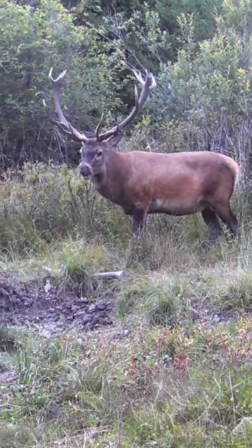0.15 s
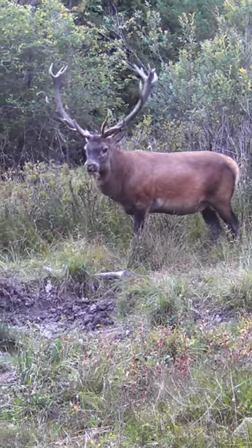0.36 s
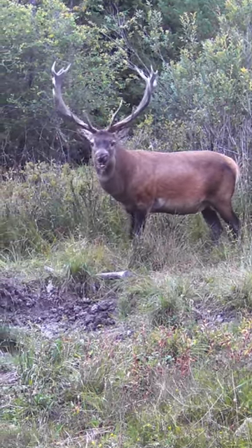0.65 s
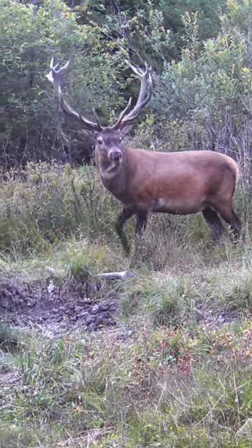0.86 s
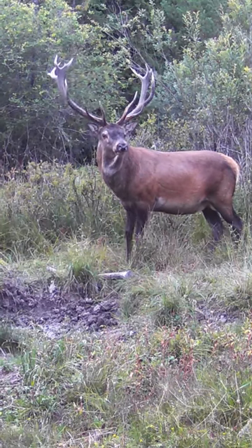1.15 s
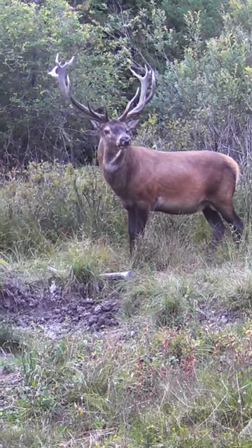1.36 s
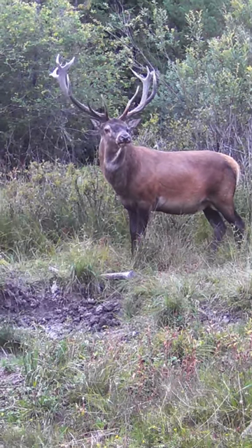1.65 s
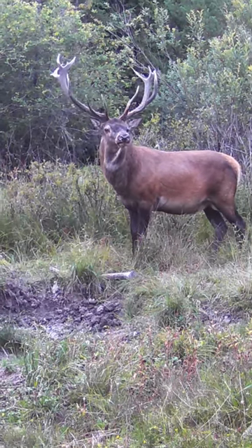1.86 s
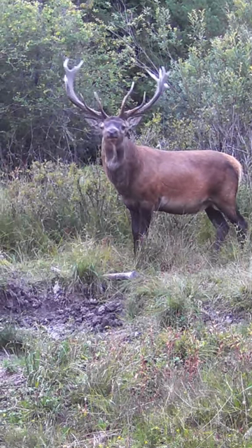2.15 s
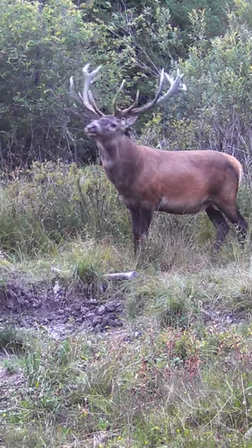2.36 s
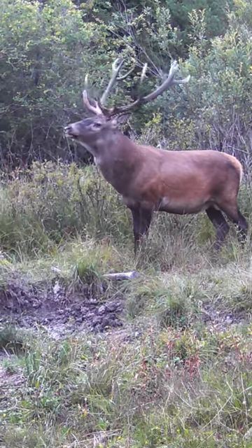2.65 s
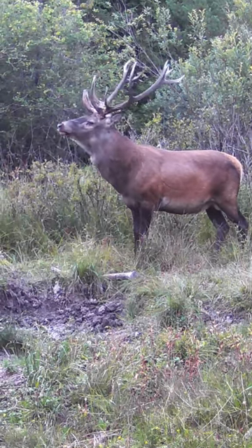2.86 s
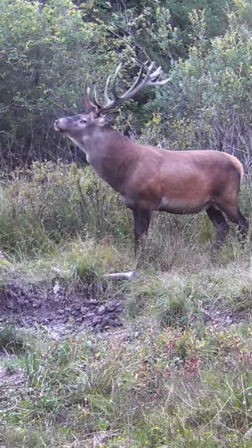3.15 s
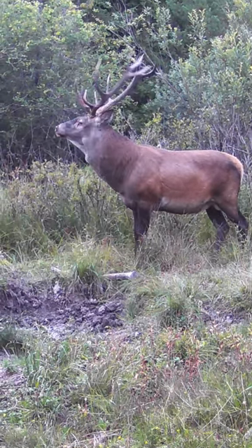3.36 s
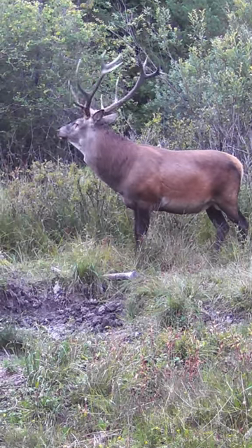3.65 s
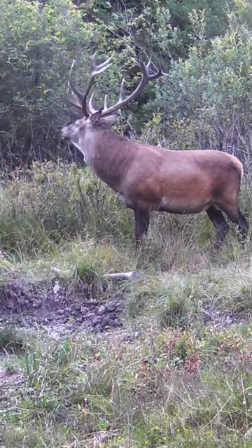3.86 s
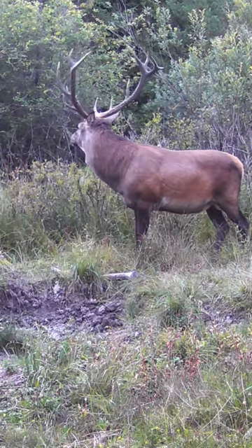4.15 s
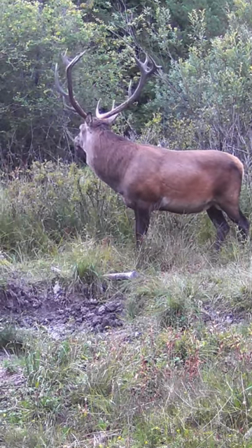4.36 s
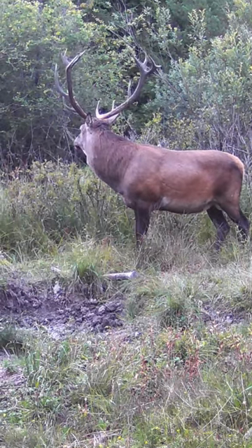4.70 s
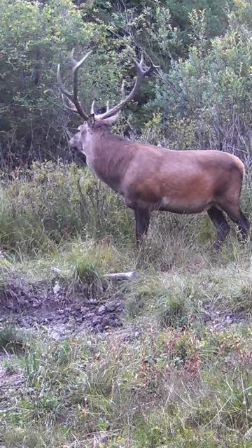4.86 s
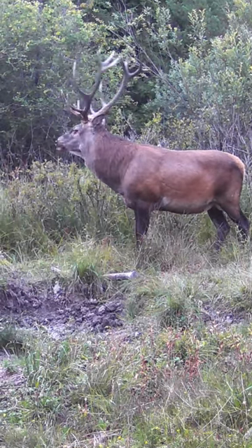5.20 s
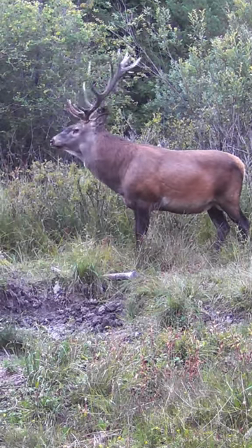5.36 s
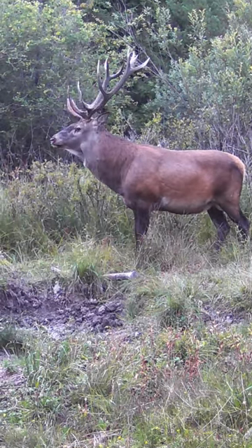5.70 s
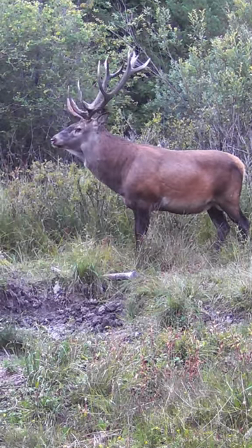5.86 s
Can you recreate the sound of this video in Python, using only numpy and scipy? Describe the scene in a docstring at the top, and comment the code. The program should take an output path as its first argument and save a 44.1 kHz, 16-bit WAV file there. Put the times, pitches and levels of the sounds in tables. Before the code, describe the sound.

A small bird's fast, high trill swells and stops abruptly; dry ticks follow, the near hiss thickens and a woodpecker begins sharp arched yelps, with dull overload pops. Trees echo each call. Thin peeps answer from afar, and a second trill builds midway. Low rumble, faint moaning and leaf hiss lie beneath. The last three calls sound distant. Outdoor stereo pickup, with the close calls centred.

```python
"""Rumble, a drone, a faint moan and leaf hiss, all shaped noise, lie under a small bird already trilling in
V-shaped tones. Dry ticks ring, and a far bird peeps in thin, hoarse sine whistles. A woodpecker close by gives
nine sharp arched calls, the last three from further off: three partials each, with a band of noise around them
and dull overload pops. Calls and peeps echo in the trees through decaying noise. Faint low notes, perhaps a
stag far off, are sines too, and a second trill follows."""
import sys
import numpy as np
from scipy import signal
from scipy.fft import rfft, irfft
from scipy.io import wavfile
from scipy.ndimage import uniform_filter1d, map_coordinates

SR = 44100
rng = np.random.default_rng(int(sys.argv[2]) if len(sys.argv) > 2 else 0)


def ratio(d):
    """dB to gain"""
    e = np.asarray(d, float) / 20
    return 10 ** e


def waveform_to_disk(signal):
    """Save audio, clipped to [-1, 1], as 16-bit WAV at the path in sys.argv[1]."""
    frames = np.transpose(np.atleast_2d(signal))
    scaled = np.clip(frames, -1, 1) * 32767
    samples = np.round(scaled).astype(np.int16)
    wavfile.write(sys.argv[1], SR, samples)


N = 266011
t = np.arange(N) / SR


def level(x, db):
    """Scale to an rms level."""
    return x * ratio(db) / np.sqrt(np.mean(x ** 2))


def curve(points, x, **ends):
    """Read a two-column table at x, joining its points by straight lines."""
    return np.interp(x, *np.transpose(points), **ends)


def colour(x, points):
    """Filter by (f/Hz, level/dB) points joined on a log frequency axis."""
    hz, db = np.transpose(points)
    f = np.arange(N // 2 + 1) * SR / N + 1
    gain_db = np.interp(np.log(f), np.log(hz), db, left=-99, right=-99)
    return irfft(rfft(x) * ratio(gain_db), N)


def noise(points):
    """Coloured noise of rms 1."""
    return level(colour(rng.standard_normal(N), points), 0)


def walk(rate):
    """Random levels held 1 / rate s and slewed twice; spread near 1."""
    hold = int(SR / rate)
    steps = np.repeat(rng.standard_normal(N // hold + 1), hold)
    return 1.3 * uniform_filter1d(uniform_filter1d(steps, hold), hold)[:N]


def smooth(x, s):
    """Round the corners of a curve."""
    return uniform_filter1d(x, max(int(s * SR), 1))


def tone(hz, db, multiple=1):
    """A sine that follows pitch and rms level curves."""
    return np.sqrt(2) * ratio(db) * np.sin(2 * np.pi * multiple * np.cumsum(hz) / SR)


def spread(points, side_db, lean_db=0.):
    """Noise shared by both channels plus a part of opposite sign in each, leaning left."""
    pair = noise(points) + ratio(side_db) * noise(points) * np.array([[1], [-1]])
    return pair * ratio(np.array([[lean_db], [-lean_db]]) / 2)


# spectra of the deepest noise, the rumble and the drone: f/Hz, relative level per Hz/dB
DEEP = [(12, 5.5), (25, 6), (50, 2), (75, -31)]
RUMBLE = [(45, -21.5), (65, -4), (85, -3), (105, 3), (125, -5.5), (150, -23)]
DRONE = [(110, -26.5), (135, -1), (170, -6.5), (230, -14), (400, -36)]
# the far rumble swells and fades: t/s, level/dB
RUMBLE_LEVEL = [(0.0, -58), (0.2, -57), (0.72, -48), (1.93, -52), (2.25, -48), (2.57, -53), (3.44, -55),
                (3.91, -57), (4.25, -57), (4.32, -55), (4.95, -61), (5.24, -60), (5.57, -63), (6.03, -56)]


def rumble_and_drone():
    """Three low noise bands throb at random; the drone swells a little more steeply than the rumble."""
    swell_db = curve(RUMBLE_LEVEL, t)
    deep = spread(DEEP, -11, lean_db=-0.5) * ratio(-1.5 + 2.0 * walk(9.8))
    rumble = spread(RUMBLE, -11, lean_db=4.0) * ratio(3.8 * walk(8.3))
    # 1.15 dB of drone per dB of rumble, pivoting about a rumble of -55 dB
    drone_db = -3 - 55 + 1.15 * (swell_db + 55)
    drone = spread(DRONE, -8.5, lean_db=5.5) * ratio(drone_db + 3.7 * walk(8.8))
    return (deep + rumble) * ratio(swell_db) + drone


# resonances of the moan: f/Hz, width/Hz, relative level/dB
MOAN = [(325.3, 71, -1.5), (429, 86, -0.5), (572, 140, -5.5)]
# the moan comes and goes, ahead of its random waver: t/s, level/dB
MOAN_LEVEL = [(0.0, -66), (0.65, -63), (0.94, -57), (2.1, -55), (2.48, -58), (2.87, -56), (3.93, -63),
              (4.7, -63), (5.34, -67), (6.03, -67)]


def moan():
    """Noise through three resonances standing on a flat floor, slowly wavering."""
    hz = np.geomspace(150, 1200, 200)
    shape = sum(ratio(db) / (1 + (2 * (hz - f) / width) ** 2) for f, width, db in MOAN)
    points = np.transpose([hz, 20 * np.log10(shape + 0.25)])
    return spread(points, -12.5, lean_db=1.) * ratio(curve(MOAN_LEVEL, t) + 1.9 * walk(4))


# spectra of the leaves and of the finest hiss: f/Hz, relative level per Hz/dB
LEAVES = [(290, -35.5), (500, -8.5), (545, -18.5), (729, -11), (1320, -13), (2260, -14), (3020, -12.5),
          (4280, -14.5), (5880, -15), (16000, -33.5)]
AIR = [(6000, -21.5), (9000, 4), (13000, -5), (16000, -15)]
# t/s, level of the finest hiss/dB, gain on the leaves/dB
BREEZE = [(0, -98, 1.5), (.6, -94, 1), (0.801, -76, 1), (2, -80.5, 2), (3.5, -78, 0.5), (4.8, -76.5, -0.5),
          (6.03, -80, -1.5)]


def leaf_hiss():
    """Leaves as wide noise plus a duller layer in the middle, with the finest hiss on top."""
    breeze_s, air_db, breeze_db = np.transpose(BREEZE)
    air = spread(AIR, -1) * ratio(np.interp(t, breeze_s, air_db))
    dull = [(f, db - 6 * np.log2(1 + (f / 2000) ** 2)) for f, db in LEAVES]
    leaves_db = -60.5  # ahead of the breeze
    leaves = level(spread(LEAVES, -1, lean_db=1.), leaves_db) + level(noise(dull), leaves_db - 5)
    return leaves * ratio(np.interp(t, breeze_s, breeze_db)) + air


# share of the near wood's hiss and of the converter's offset: t/s, share
NEAR = [(0, 0.07), (.705, 0), (.71, 0.88), (4.85, 0.71), (5.2, 0.31), (5.6, .15), (6.03, 0)]
# spectrum of the near wood's hiss: f/Hz, relative level per Hz/dB
WOOD = [(200, -7), (600, -5.5), (1500, -15), (2500, -7), (4200, -4.5), (5500, -15.5), (8500, -16.5),
        (9000, -35)]


def near_wood():
    """Steady noise and a constant offset, faded together by one share curve."""
    share = curve(NEAR, t)
    return share * ratio(-59.5) * noise(WOOD), share * -0.013


# trills: t of the lowest point of the first note/s, notes per s at that point
TRILLS = [(-.01, 20.92), (2.715, 21.12)]
# each note falls, then shoots up: share of period, f/Hz, relative level/dB
NOTE = [(-.3, 6100, -20), (-.22, 5800, -2), (0, 4350, 0), (.1, 4900, -6), (.22, 6600, -3), (.3, 7400, -20)]
# one curve per trill, ahead of flicker and scatter: t/s, level/dB
TRILL_LEVEL = [
    [(0, -65), (.1, -65), (.4, -59), (.67, -53.5), (.69, -104)],
    [(2.75, -84.5), (3.1, -57.5), (3.6, -55), (4.2, -53), (5.0, -53.5), (5.28, -54.5), (5.33, -96.5)],
]
TIRING = .031  # notes lost, times the cube of the seconds sung


def trill():
    """Quick V-shaped notes that slow down, reaching the two channels by unlike paths."""
    share, note_hz, note_db = np.transpose(NOTE)
    out = np.zeros(N)
    for (first_s, rate), points in zip(TRILLS, TRILL_LEVEL):
        sung_s = t - first_s
        place = (rate * sung_s - TIRING * sung_s ** 3 + .5) % 1 - .5
        db = np.interp(place, share, note_db, left=-60, right=-60)
        db = db + curve(points, t, left=-150, right=-150)
        out += tone(np.interp(place, share, note_hz), db + 2.2 * walk(25))
    scatter = rng.standard_normal((2, SR // 4)) * ratio(-29 - 60 * t[:SR // 4] / .4)
    scatter[0, 0], scatter[1, 2] = .95, .75  # direct paths, the right two samples later
    return signal.fftconvolve(out[None], scatter, axes=1)[:, :N]


# dry ticks, ahead of half_rate(): t/s, starting level of the ring/dB, f/Hz
TICKS = [(0.7062, -40, 1220), (0.7194, -34.5, 1840), (0.7356, -39.5, 1180), (1.2083, -26.5, 2540)]


def ticks():
    """Short rings of dry wood: sines dying away within milliseconds."""
    out, age = np.zeros(N), t[:SR // 50]
    for s, db, hz in TICKS:
        out[int(s * SR):][:len(age)] += ratio(db) * np.exp(-age / 0.00088) * np.sin(2 * np.pi * hz * age)
    return out


# a whistle scoops up to pitch and sags again: share of length, share of pitch
SCOOP = [(0, .975), (.4, 1), (1, .985)]


def whistles(notes, hoarse_db, rate):
    """Thin tones, made hoarse by the distance: pitch and level waver at random."""
    out, wobble = np.zeros(N), 1 + .011 * walk(rate)
    for start, length, pitch_hz, db in notes:
        share = (t - start) / length
        hz = pitch_hz * curve(SCOOP, share) * wobble
        out += tone(hz, db) * np.sin(np.pi * np.clip(share, 0, 1)) ** .5
    return out * ratio(hoarse_db * walk(rate))


# far bird, ahead of waver and half_rate(): t/s, length/s, f/Hz, level/dB
PEEPS = [(.72, .1, 4170, -66), (.82, .11, 4220, -62), (.92, .16, 4200, -63), (1.545, .07, 4230, -51),
         (1.62, .17, 4200, -64), (1.805, .03, 4150, -54), (2.512, .035, 4380, -59), (2.55, .14, 4450, -68),
         (3.13, .08, 4300, -60), (3.285, .035, 3300, -61), (3.88, .07, 4200, -67), (4.535, .065, 4230, -59),
         (4.79, .075, 4200, -54)]


def far_bird():
    """Short peeps as whistles with a fast waver."""
    return whistles(PEEPS, hoarse_db=3.5, rate=300)


# calls: t of the top of the arch/s, top f/Hz, effort/dB, squareness (0 round, 1 square, more overshoots),
# dip of the second partial at the top/dB
WOODPECKER = [(1.104, 2633, -16, 1.0, -3), (1.859, 2729, -17.5, 1.5, -18), (2.7205, 2620, -14.5, 0.0, -5),
              (3.3987, 2740, -16, 0.0, -7), (4.185, 2720, -16.5, 0.0, -12), (4.702, 2740, -16.5, .9, -17),
              (5.243, 2770, -27, .7, -23), (5.502, 2650, -32, .7, -17), (5.7685, 2740, -46, .7, -14)]
# how each call reaches the listener as the head turns, and how loud its band of noise is: # fundamental/dB,
# noise band/dB, third partial/dB, echo from a trunk/dB, scatter in the trees/dB
FACING = [(-8, -8.5, 0.5, -12, -7), (-4.5, -10, -10, -7, -2), (-6, -8, 1.5, -9, -3.5),
          (-6.5, -10, -1, -13, -7), (-6.5, -12, -1.5, -14.5, -7.5), (-18, -14, -4, -13, -6.5),
          (-9, -12, -19, -35, -16), (-11, -11, -17, -29, -16), (-11, -6, -16, -39, -23)]
# the arch of a close call: t from the top/s, round share of top pitch, round level/dB,
# square share of top pitch, square level/dB
ARCH = [(-.024, .45, -10, .39, -20), (-.018, .56, -8, .51, -12), (-.014, .69, -3, .68, -5),
        (-.0095, .74, 0, .77, 1), (-.006, .91, 0, .93, -1), (0, 1, 0, 1, 0), (.006, .93, 0, .96, 0),
        (.011, .8, 1, .87, -3), (.016, .64, 1, .61, 1), (.021, .56, -5, .44, -5), (.027, .48, -6, .42, -9)]
# the throat passes the first and second partials by where they lie: f/Hz, level/dB
FIRST = [(1200, -36), (1600, -24), (2000, -13), (2400, -4), (2700, 0)]
SECOND = [(1500, -26), (2250, -16), (2650, -2), (3000, 0)]
# the deeper the dip, the further down both partials are heard: dip/dB, share of the throat's loss
THROAT_LOSS = [(-18, .33), (-12, 1)]
# third partial against the call's effort, by where it lies: f/Hz, level/dB
THIRD = [(2500, -10), (3600, -4), (4500, -20.5), (6000, -27.5), (8000, -19.5)]
# band of noise around each call: f/Hz, relative level per Hz/dB
CALL_NOISE = [(60, -24), (400, -20.5), (900, -6.5), (2000, -9), (4000, 7), (5500, -17), (5900, -13.5),
              (8000, -19.5), (8600, -50.5)]
# distant calls lose the low ends of the arch: rising level/dB, falling level/dB
ENDS_DB = (-50, -6)
CLOSE_DB, DISTANT_DB = -18, -23  # a call turns from close to distant between these efforts
DISTANT_LENGTH = .9  # share of a close call's length
ENDS_SHARE, DIP_FROM = .74, .8  # shares of top pitch: the ends begin below, the dip sets in above
CALL_NOISE_S = 0.019  # span over which the noise evens out


def woodpecker():
    """Three partials on an arched pitch, with a band of noise around them; returns the calls and their trunk
    and tree feeds."""
    call = np.searchsorted([c[0] - .07 for c in WOODPECKER[1:]], t)  # which call sounds at each moment
    top_s, top_hz, call_db, square, dip_db = np.transpose(WOODPECKER)[:, call]
    first_db, noise_db, third_db, trunk_db, scatter_db = np.transpose(FACING)[:, call]
    arch_s, *arch = np.transpose(ARCH)
    closed = curve(THROAT_LOSS, dip_db)
    far = np.clip((CLOSE_DB - call_db) / (CLOSE_DB - DISTANT_DB), 0, 1)
    since = (t - top_s) / (1 - far * (1 - DISTANT_LENGTH))
    # the pitch bends smoothly through its points
    place = np.interp(since, arch_s, np.arange(len(ARCH)))
    arch = np.array([map_coordinates(a, [place], order=3, mode="nearest") for a in arch])
    share, db = arch[:2] + square * (arch[2:] - arch[:2])
    hz = top_hz * share * (1 + .008 * walk(400))
    # each call fades quickly beyond the ends of its arch
    gate_s = [arch_s[0] - .001, arch_s[0], arch_s[-1], arch_s[-1] + .012]
    db = db + np.interp(since, gate_s, [-70, 0, 0, -70])
    ends_db = far * np.where(since < 0, *ENDS_DB) * np.clip(6 * (ENDS_SHARE - share), 0, 1)
    db = smooth(call_db + db + ends_db, 0.0013)
    first_db = db + first_db + curve(FIRST, top_hz * share) * closed
    db = db + dip_db * np.clip((share - DIP_FROM) / (1 - DIP_FROM), 0, 1)
    second_db = db + curve(SECOND, 2 * top_hz * share) * closed
    effort = np.sqrt(ratio(first_db) ** 2 + ratio(db) ** 2)
    first = tone(hz, first_db)
    second = tone(hz, second_db + 2.0 * walk(300), multiple=2)
    third = ratio(third_db) * effort * tone(hz, curve(THIRD, 3 * hz), multiple=3)
    # the noise sets in at once with the call and evens out its dips
    onset = np.clip(effort / ratio(-54), 0, 1) ** .5
    noise_level = np.sqrt(smooth(effort ** 2, CALL_NOISE_S) + 1e-12) * onset
    # faint noise swells around the distant calls, beginning before them
    slow_noise_level = np.sqrt(smooth(smooth(effort ** 2, 0.044), .012) + 1e-12)
    noise_level = np.maximum(noise_level, far * slow_noise_level)
    calls = first + second + third + ratio(noise_db) * noise_level * noise(CALL_NOISE)
    return calls, calls * ratio(trunk_db), calls * ratio(scatter_db)


# dull pops during the loud calls, as from overload, ahead of half_rate(): t/s, peak level/dB
POPS = [(1.095, -28.5), (1.1, -26.5), (1.119, -25), (1.85, -45), (2.709, -28), (2.737, -16.5),
        (3.388, -25.5), (3.393, -24), (3.407, -42), (4.174, -24), (4.197, -31.5), (4.695, -32.5)]
POP_S = 0.0002


def overload_pops():
    """One-sided bell-shaped pushes during the loud calls, as from overload."""
    return sum(ratio(db) * np.exp(-((t - s) / POP_S) ** 2) for s, db in POPS)


# what comes back from the trees: f/Hz, level/dB
TREES = [(300, -29.5), (1500, -1), (2500, -6), (4000, -3), (5400, -1.5), (6000, -4), (8400, -15),
         (9000, -61)]
TRUNK_S, TRUNK_SPREAD_S = .0365, .0012  # delay and blur of the trunk's answer
TAIL_T60_S, FAR_DB, FAR_T60_S = 0.19, -18.5, 1.03  # quick scatter; level against it and decay of the tail


def trees(trunk_feed, scatter_feed):
    """One clear answer from a trunk, a quick scatter and a long faint tail."""
    age = t[:2 * SR]
    trunk = np.exp(-((age - TRUNK_S) / TRUNK_SPREAD_S) ** 2)
    tails = ratio(-60 * age / TAIL_T60_S) + ratio(FAR_DB - 60 * age / FAR_T60_S)
    scatter = tails * np.clip(age / 0.0023, 0, 1)
    # single trees stand out of the scatter
    scatter = scatter * ratio(1.5 * walk(200)[:len(age)])
    out = 0
    for feed, shape in ((trunk_feed, trunk), (scatter_feed, scatter)):
        answer = shape * rng.standard_normal(len(age))
        out = out + signal.fftconvolve(feed, answer / np.sqrt(np.sum(answer ** 2)))[:N]
    return colour(out, TREES)


# faint notes, perhaps a stag far off, ahead of their waver: t/s, length/s, f/Hz, level/dB
LOW_NOTES = [(1.98, .17, 172, -51), (1.95, .35, 338, -61), (3.05, .4, 425, -64), (4.25, .7, 425, -66)]


def low_notes():
    """Low whistled tones with a slower waver."""
    return whistles(LOW_NOTES, hoarse_db=3.0, rate=25)


CEILING = .45  # amplitude that rounded peaks approach, ahead of the filter
MIRROR_DB, MIRROR_HZ, MIRROR_TOP_HZ = -3.5, 13600, 15900


def half_rate(x):
    """A converter at half the rate: rounded peaks, and a weak smoothing filter passes the treble's mirror image."""
    rounded = CEILING * np.tanh(x / CEILING)
    x = colour(rounded, [(1, 6), (8500, 1.5), (9000, -23.5), (11000, -23.5), (11020, -107)])
    image = x * (-1.) ** np.arange(N)  # flips the spectrum about SR / 4
    edges = [(MIRROR_HZ, -30), (1.03 * MIRROR_HZ, 0), (MIRROR_TOP_HZ, 0), (1.02 * MIRROR_TOP_HZ, -30)]
    return x + ratio(MIRROR_DB) * colour(image, edges)


def scene():
    """The near wood and low notes reach both channels alike; trill and background are wide."""
    background = rumble_and_drone() + moan() + leaf_hiss()
    wood_hiss, offset = near_wood()
    peeps = far_bird()
    calls, trunk_feed, scatter_feed = woodpecker()
    echoes = trees(trunk_feed, scatter_feed + ratio(3) * peeps)
    near = wood_hiss + ticks() + peeps + calls + overload_pops() + echoes
    return half_rate(near) + offset + trill() + low_notes() + background


def band_limit(x):
    """A steep low-pass at the top of the band."""
    return signal.sosfilt(signal.butter(12, 16640, fs=SR, output="sos"), x)


def record(dry):
    """Give the finished mix its last treatment."""
    return band_limit(dry)


dry = scene()
out = record(dry)
waveform_to_disk(out)
```